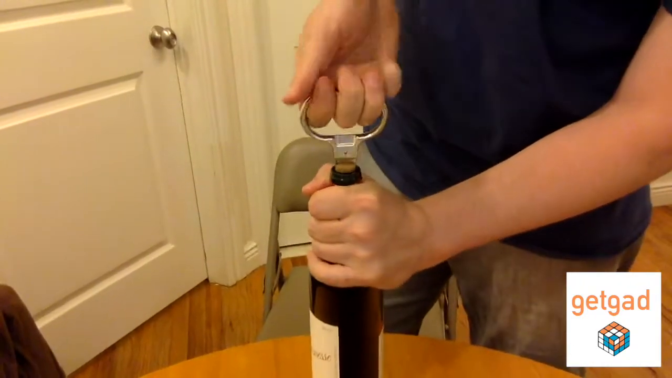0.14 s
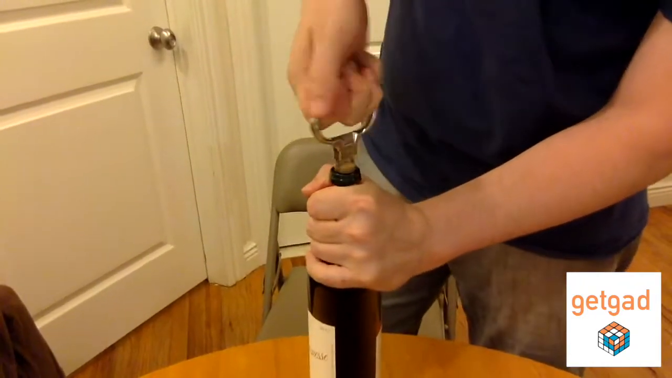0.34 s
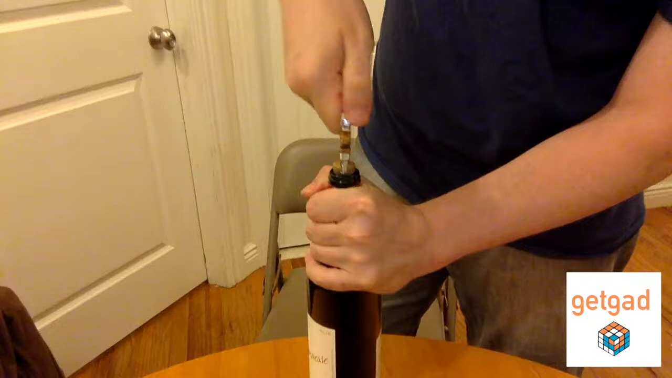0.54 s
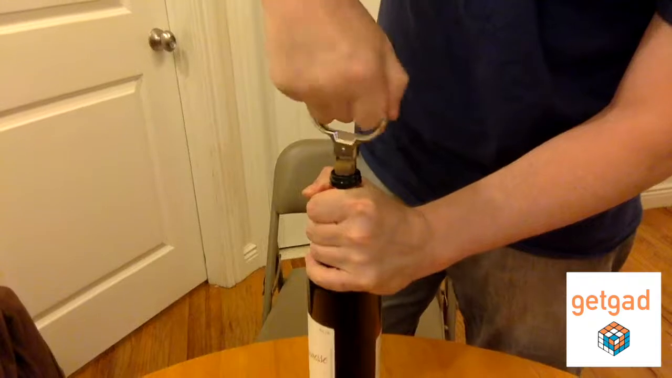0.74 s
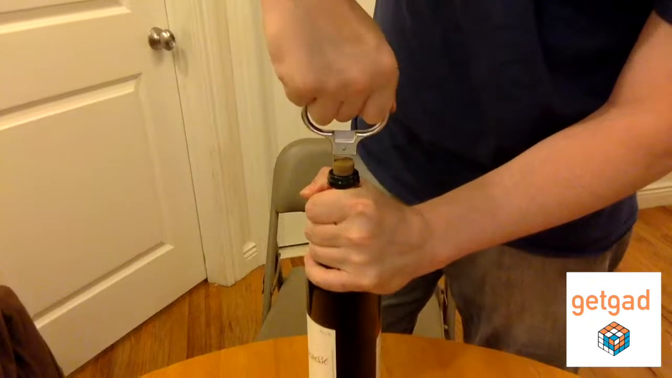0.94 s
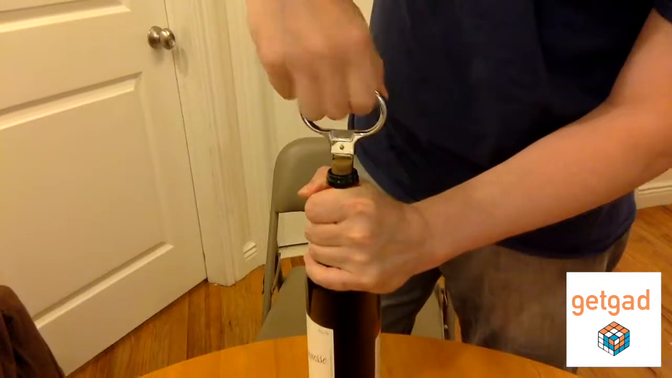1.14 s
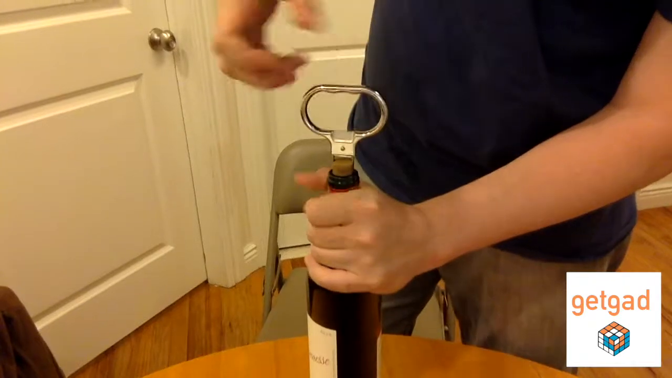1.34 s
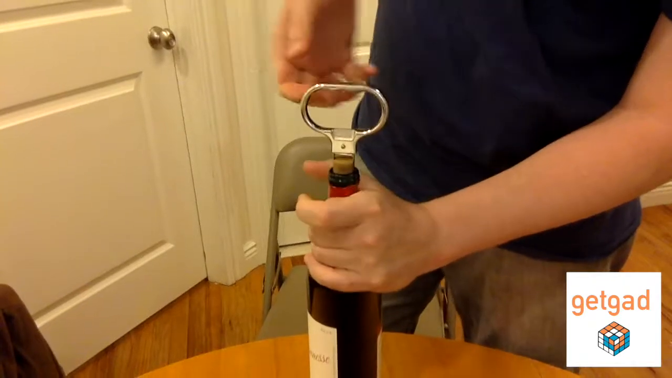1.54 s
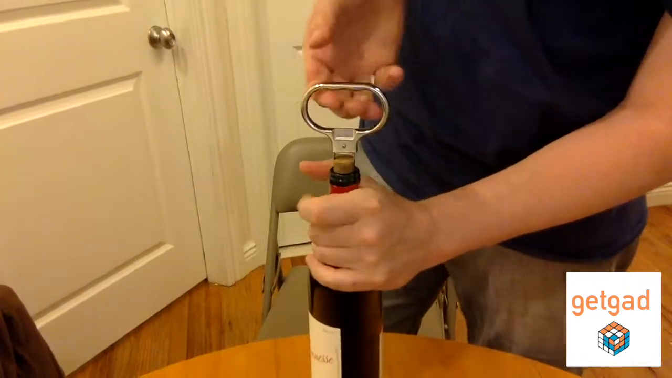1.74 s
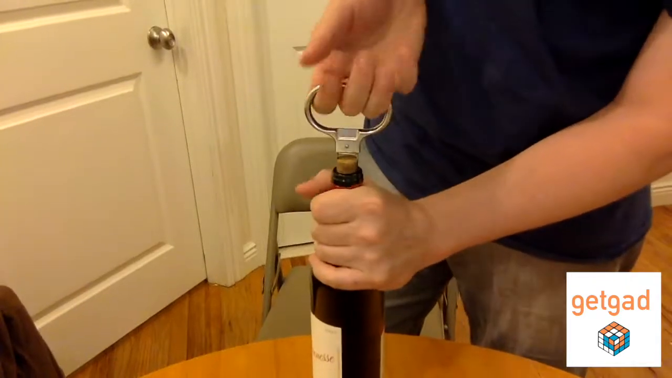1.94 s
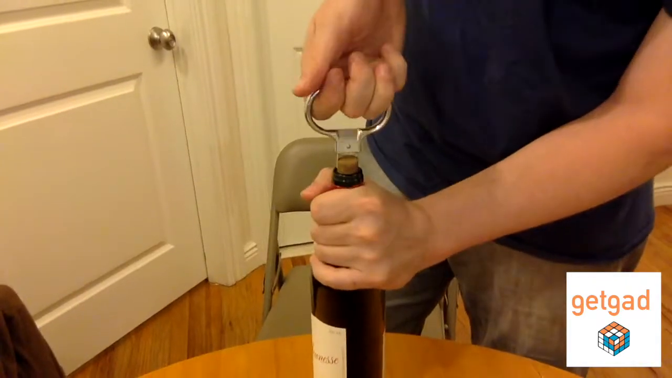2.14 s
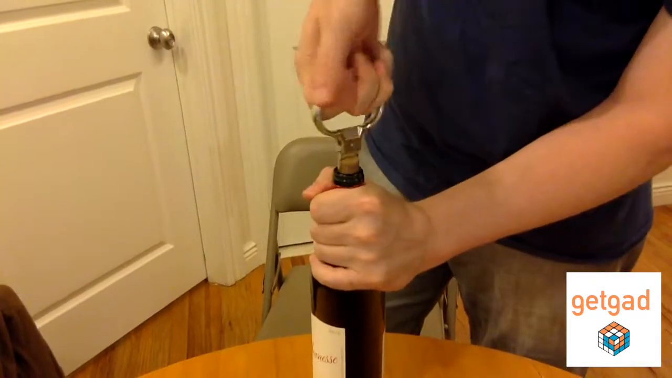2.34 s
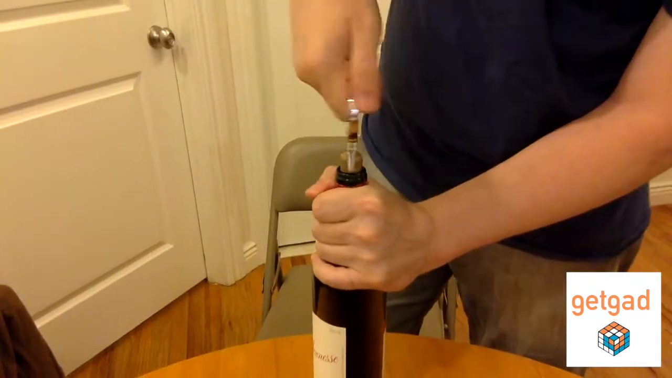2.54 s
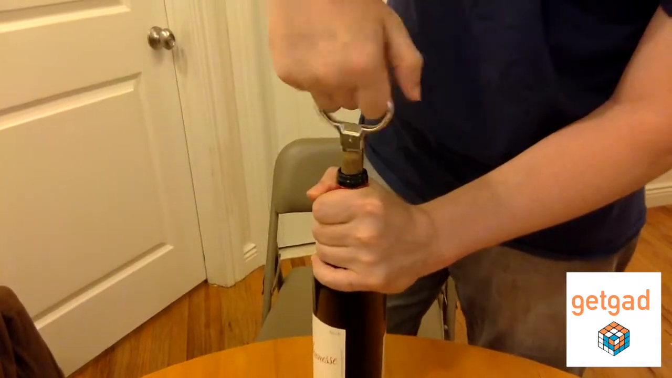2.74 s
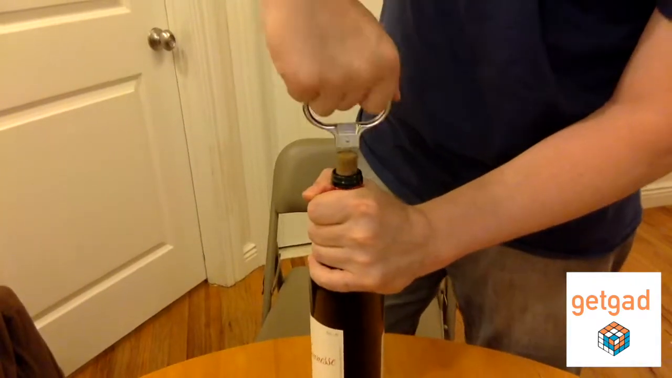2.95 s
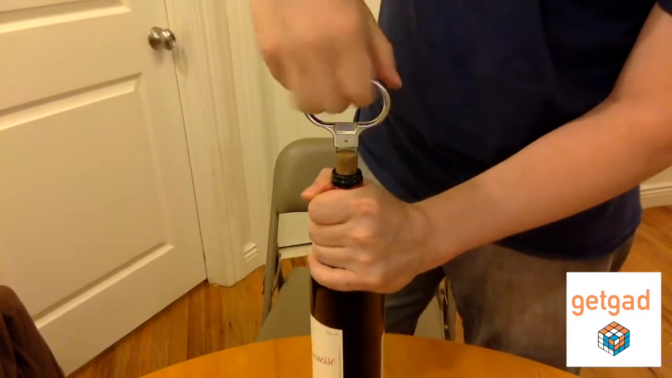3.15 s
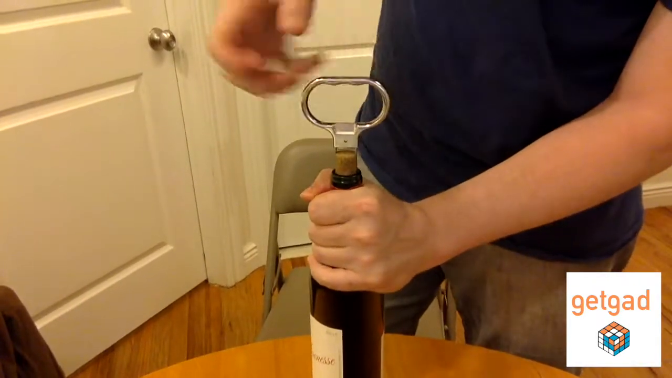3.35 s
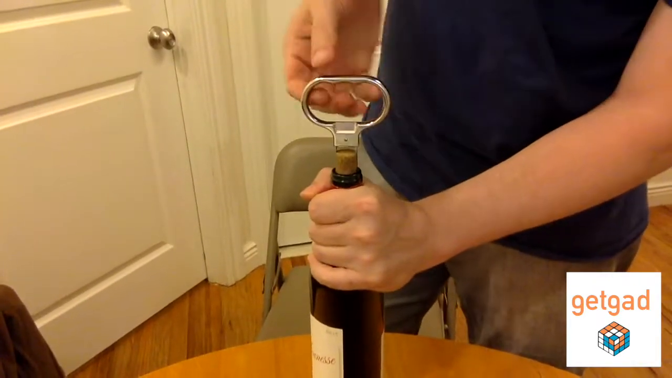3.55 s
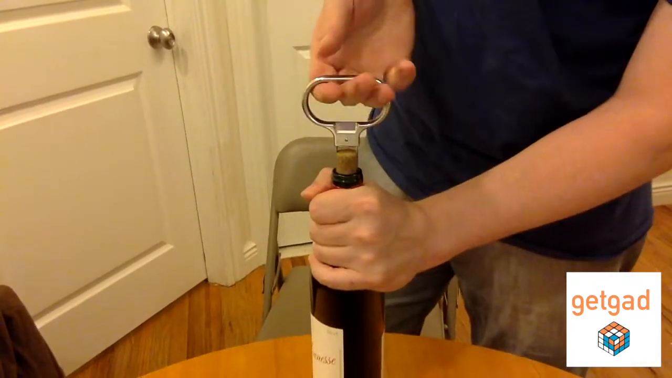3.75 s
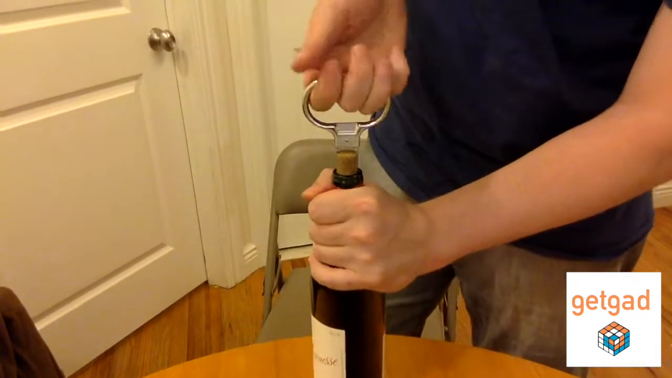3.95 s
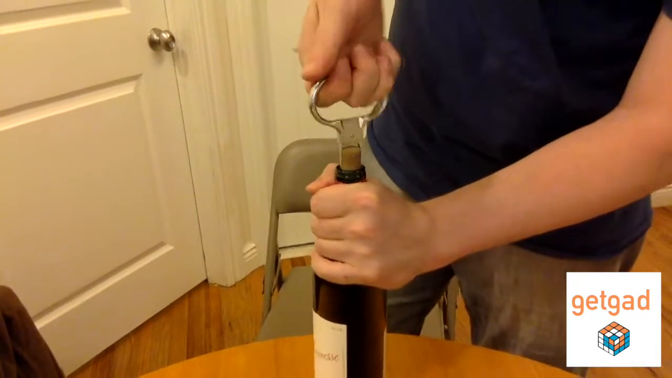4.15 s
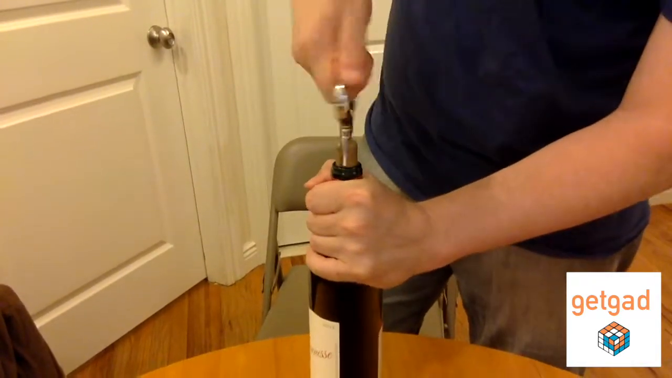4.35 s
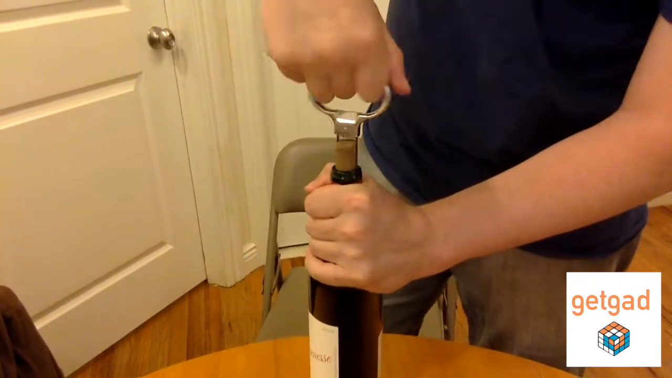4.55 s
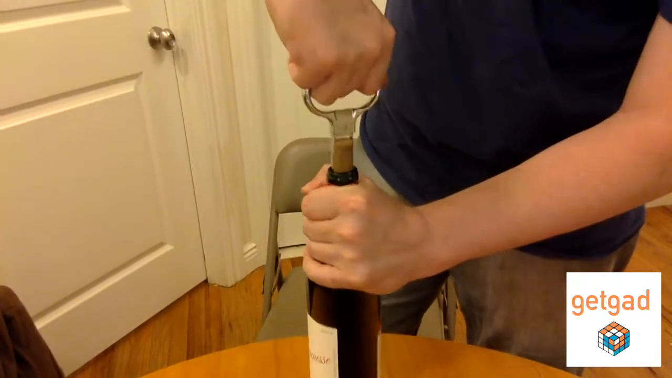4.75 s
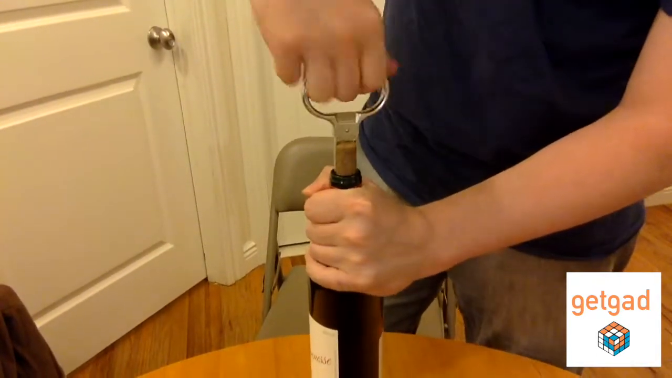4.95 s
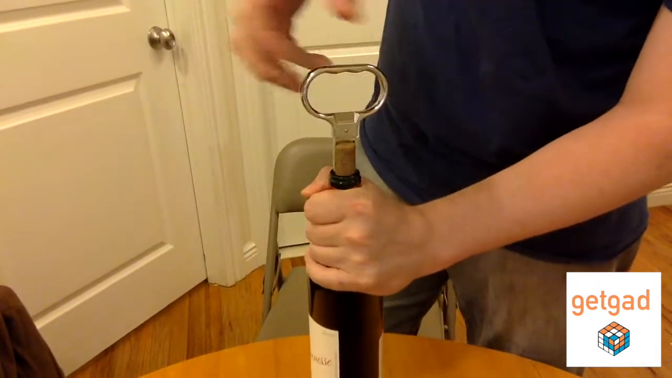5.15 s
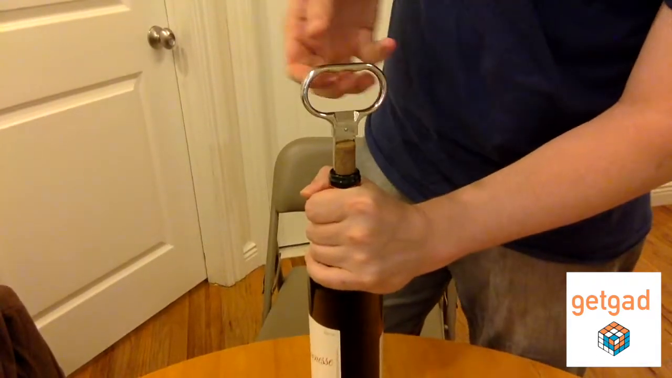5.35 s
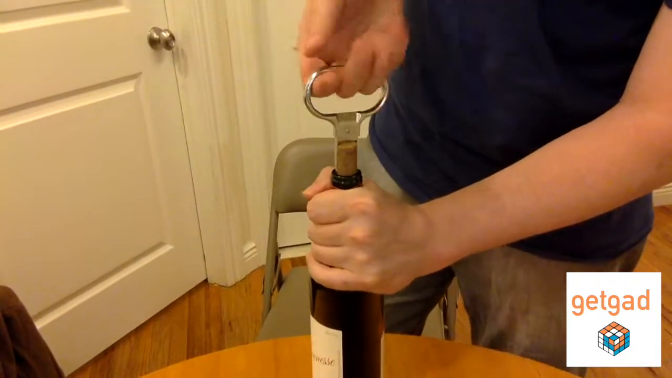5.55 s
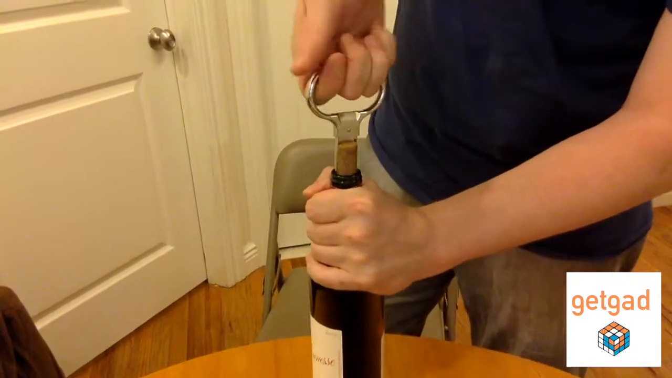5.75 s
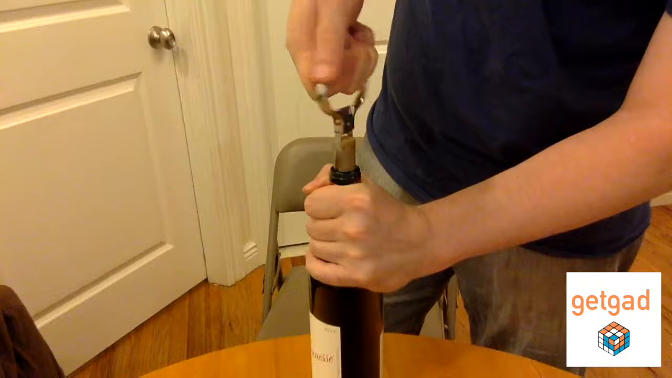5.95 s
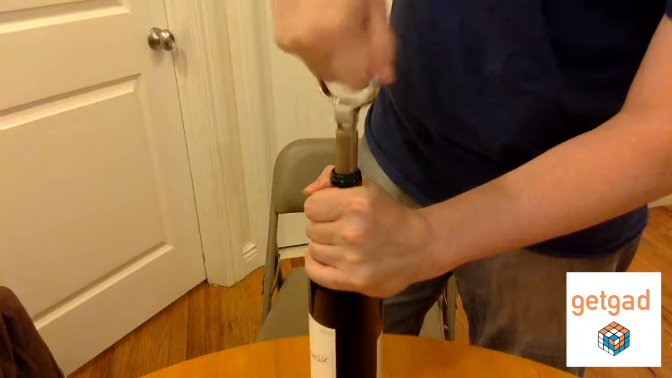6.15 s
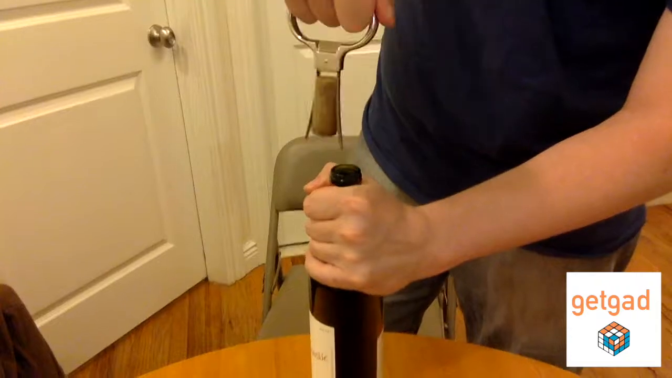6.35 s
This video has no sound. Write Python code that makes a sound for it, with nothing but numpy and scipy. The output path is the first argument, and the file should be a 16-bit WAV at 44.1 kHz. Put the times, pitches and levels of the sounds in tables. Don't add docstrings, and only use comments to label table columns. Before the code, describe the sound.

Dry, grating cork creaks chatter in four pulls, each under a second, with faint room hum between them. The first is duller and woody, the next two are stronger and glassier with thin metallic ringing, and the last is a quick rush of ticks, a soft thump, a tiny rising squeak and a bright clink of steel on glass. Heard close, in a small hard room with a short diffuse tail.

```python
import sys
import numpy as np
from scipy import signal
from scipy.fft import rfft, irfft
from scipy.io import wavfile

SR = 44100
rng = np.random.default_rng(int(sys.argv[2]) if len(sys.argv) > 2 else 0)


def decibels_to_gain(level_db):
    exponent = np.asarray(level_db, float) / 20
    return 10 ** exponent


def transcribe(signal):
    frames = np.atleast_2d(signal).T
    limited = np.clip(frames, -1, 1)
    pcm = np.round(limited * 32767).astype(np.int16)
    wavfile.write(sys.argv[1], SR, pcm)


N = 282681


def rms_one(x):
    return x / np.sqrt(np.mean(x ** 2) + 1e-20)


def edge(x, hz, kind, order=4):
    return signal.sosfilt(signal.butter(order, hz, kind, fs=SR, output="sos"), x)


def at_hz(points, hz):
    points = np.array(points)
    return np.interp(np.log(hz + 1), np.log(points[:, 0]), points[:, 1])


def follow(t, s, level_db):
    return decibels_to_gain(np.interp(t, s, level_db, left=-200, right=-200))


def coloured(x, spectrum):
    size = 4096
    cepstrum = irfft(np.log(decibels_to_gain(at_hz(spectrum, np.fft.rfftfreq(size, 1 / SR)))), size)
    cepstrum[1:size // 2] *= 2
    cepstrum[size // 2 + 1:] = 0
    response = irfft(np.exp(rfft(cepstrum)), size)
    return signal.fftconvolve(x, response / np.sqrt(np.sum(response ** 2)))[:N]


def ring(force, modes, scatter_db):
    out = np.zeros(N)
    for hz, level_db, t60 in modes:
        r = decibels_to_gain(-60 / (t60 * SR))
        w = 2 * np.pi * hz / SR
        struck = force * decibels_to_gain(level_db + scatter_db * rng.standard_normal(N))
        out += signal.lfilter([0, np.sin(w)], [1, -2 * r * np.cos(w), r * r], struck + 1e-18)
    return out


def tearing(force, db_per_ms):
    r = decibels_to_gain(-2 * db_per_ms * 1000 / SR)
    power = signal.lfilter([1 - r], [1, -r], force ** 2 + 1e-24)
    return np.sqrt(power) * rng.standard_normal(N)


def glide(rows, partials):
    s, hz, level_db = np.transpose(rows)
    t = np.arange(N) / SR
    phase = 2 * np.pi * np.cumsum(np.interp(t, s, hz)) / SR
    tone = sum(decibels_to_gain(db) * np.sin(k * phase) for k, db in partials)
    return np.sqrt(2) * follow(t, s, level_db) * tone


# [f/Hz, level/dB per Hz]
AIR_SPECTRUM = [(30, -30), (55, -1), (150, -18), (244, -15), (600, -25), (1100, -15.5), (6330, -35),
                (8080, -45)]
# [f/Hz, level/dB rms]
HUM_TONES = [(60, -77.5), (120, -81.5), (8900, -100)]
# [t/s, f/Hz, level/dB]
MOTOR = [
    (0, 71.8, -75),
    (1.0, 72, -77),
    (1.5, 73.7, -72),
    (2.3, 72, -61),
    (3.0, 69.6, -79),
    (6.4, 71.4, -88),
]


def room_tone():
    t = np.arange(N) / SR
    out = decibels_to_gain(-68) * coloured(rng.standard_normal(N), AIR_SPECTRUM)
    for hz, level_db in HUM_TONES:
        out += np.sqrt(2) * decibels_to_gain(level_db) * np.sin(2 * np.pi * hz * t)
    return out + glide(MOTOR, [(0.93, 0.0095)])


# [t/s, peak level/dB]
HAND_NUDGES = [(0.12, -53), (2.118, -56.5), (3.638, -57.5), (3.799, -51), (3.832, -57), (3.868, -51),
               (4.11, -54), (4.877, -37.5), (4.97, -48.5), (5.267, -61), (5.61, -58), (5.63, -54),
               (5.655, -58), (6.165, -32), (6.187, -29)]
# [f/Hz, level/dB, T60/s]
TABLE_MODES = [(265.3, 0.5, 0.14), (271.2, 1.5, 0.08), (322, 1, 0.099), (348.4, -14.5, 0.012),
               (462.4, -17, 0.15)]
# [f/Hz, level/dB, T60/s]
LEG_MODES = [(98.3, -10, .2), (151.8, -16.5, 0.288)]


def nudges():
    hand_damping = 0.47
    force = np.zeros(N)
    for s, db in HAND_NUDGES:
        force[round(s * SR)] = decibels_to_gain(db)
    soft = edge(force, 840.0, "low", order=2)
    damped = [(hz, db, t60 * hand_damping) for hz, db, t60 in TABLE_MODES + LEG_MODES]
    thud = ring(force, damped, scatter_db=2)
    return edge(decibels_to_gain(-11.0) * thud + decibels_to_gain(12.0) * soft, 65.0, "high")


# [f/Hz, T60/s]
REVERBERATION = [(200, 0.35), (1000, 0.39), (4000, 0.41), (12000, 0.29)]


def room(x):
    gap_s, onset_s = .003, 0.0078
    t = np.arange(SR // 2) / SR
    tail = np.zeros(len(t))
    edges = 60 * 2. ** np.arange(9)
    for low, high in zip(edges, edges[1:]):
        octave = signal.butter(2, [low, high], "band", fs=SR, output="sos")
        band = signal.sosfilt(octave, rng.standard_normal(len(t)))
        tail += band * decibels_to_gain(-60 * t / at_hz(REVERBERATION, np.sqrt(low * high)))
    tail *= np.clip((t - gap_s) / onset_s, 0, 1)
    return signal.fftconvolve(x, tail / np.sqrt(np.sum(tail ** 2)))[:N]


# [t/s, peak level/dB, tick pitch f/Hz]
LOAD_CREAKS = [(0.2143, -52, 5300), (2.2172, -46, 3600), (2.2299, -56, 2600), (2.2479, -48, 3200),
               (2.2814, -36, 3300), (4.1086, -58, 3000), (4.1131, -56, 5300), (4.1302, -58, 3000),
               (4.1338, -56, 5300), (5.9208, -48, 4100)]
# [t/s, peak level/dB, tick pitch f/Hz]
FIRST_PULL = [(0.2583, -32, 2400), (0.3032, -29, 4770), (0.3336, -24, 2590), (0.3611, -25, 2600),
              (0.385, -23, 4410), (0.4145, -23, 4650), (0.4489, -25, 4640), (0.4813, -24, 4580),
              (0.5162, -23, 4120), (0.5304, -22, 2990), (0.5616, -21, 3920), (0.5975, -23, 4130),
              (0.6355, -22, 4480), (0.6624, -24, 2280), (0.6914, -24, 3640), (0.7424, -24, 3600),
              (0.7904, -23, 4680), (0.8215, -24, 2300), (0.8374, -21, 2300), (0.8974, -26, 2630),
              (0.9572, -23, 2270), (0.9804, -34, 3010)]
SECOND_PULL = [(2.2842, -25, 2560), (2.3072, -23, 3000), (2.3346, -22, 5440), (2.3625, -23, 4340),
               (2.3885, -20, 5980), (2.4139, -18, 5450), (2.4453, -18, 5860), (2.4862, -17, 6360),
               (2.5042, -19, 3080), (2.5586, -19, 3640), (2.6145, -19, 3010), (2.6549, -18, 3350),
               (2.6664, -18, 2200), (2.6804, -18, 2280), (2.7014, -19, 2200), (2.7487, -19, 2340),
               (2.7831, -20, 2410), (2.8115, -21, 2470), (2.837, -19, 4270), (2.8594, -20, 2360),
               (2.8844, -21, 2990), (2.9432, -20, 4260), (2.9684, -31, 4350)]
THIRD_PULL = [(4.151, -24, 4270), (4.1834, -21, 3100), (4.2108, -21, 4260), (4.2423, -21, 3000),
              (4.2966, -19, 4310), (4.3224, -17, 4380), (4.3354, -21, 3000), (4.36, -15, 4310),
              (4.3959, -15, 4350), (4.4413, -14, 4340), (4.4712, -12, 4410), (4.4874, -14, 4480),
              (4.5131, -17, 4400), (4.5241, -15, 4420), (4.5374, -13, 4310), (4.5664, -17, 5190),
              (4.5944, -17, 4420), (4.6229, -16, 4290), (4.6464, -17, 4260), (4.6794, -16, 3010),
              (4.7144, -17, 4260), (4.7374, -17, 4170), (4.7584, -21, 3000)]
LAST_PULL = [(5.9279, -19, 4430), (5.9609, -15, 4420), (5.9778, -18, 4260), (6.0033, -19, 4430),
             (6.0252, -19, 4430), (6.0437, -20, 4420), (6.0554, -20, 4430), (6.0694, -20, 3980),
             (6.0871, -21, 4290), (6.1025, -18, 4380), (6.1294, -19, 3860), (6.1434, -20, 3940),
             (6.1834, -20, 3820), (6.2134, -20, 3990)]
# [from t/s, until t/s, gap between slips/s, stick before next/s, tick f/Hz]
CREEP_RUNS = [
    (0.25, 0.37, .0148, .008, 2800),
    (0.37, 0.65, .0135, .016, 4000),
    (0.65, 0.9, .0115, .006, 3600),
    (2.41, 2.5, .0135, .008, 5800),
    (2.5, 2.69, .0135, .008, 3400),
    (2.69, 2.95, .016, .009, 3300),
    (4.18, 4.55, .0128, .007, 5100),
    (4.55, 4.76, .0085, .005, 5300),
    (6.1, 6.22, .007, .004, 4000),
]


def slips():
    rise_s, breakaway_db = .001, 2
    twin_lag_s, twin_db, twin_scatter_db = .0041, -5.5, 2
    creep_db, creep_scatter_db, jitter, octaves = -3.5, 2, .08, 0.39
    rows, stuck = list(LOAD_CREAKS), np.zeros(N)
    for big in (FIRST_PULL, SECOND_PULL, THIRD_PULL, LAST_PULL):
        for (s, db, hz), (next_s, next_db, _) in zip(big, big[1:] + big[-1:]):
            chance = rng.standard_normal((8, 3)).clip(-2, 2)
            if s == big[0][0]:
                db += breakaway_db
            s, next_s = s + rise_s, next_s + rise_s
            rows.append((s, db, hz))
            twin_level = db + twin_db + twin_scatter_db * chance[0, 0]
            rows.append((s + twin_lag_s, twin_level, hz * 2 ** (octaves * chance[0, 1])))
            for start, end, gap, stick, creep_hz in CREEP_RUNS:
                if not start <= (s + next_s) / 2 < end:
                    continue
                stuck[round((next_s - stick) * SR):round(next_s * SR)] = 1
                count = int((next_s - stick - s) / gap)
                for k, (late, loud, high) in zip(range(1, 1 + count), chance[1:]):
                    level = (db + next_db) / 2 + creep_db + creep_scatter_db * loud
                    rows.append((s + (k + jitter * late) * gap, level, creep_hz * 2 ** (octaves * high)))
    return np.array(rows), stuck


# [t/s, fine rubbing level/dB, free neck ring level/dB]
TWISTING = [
    [(0.256, -39, -9), (0.5, -28, -14), (0.774, -25.5, -22), (0.81, -41, -9), (0.83, -24, -8),
     (0.874, -29, -7), (0.97, -59, -7)],
    [(2.28, -45, -12), (2.314, -33.5, -16), (2.684, -25.5, -19), (2.81, -25.5, -5), (2.87, -20.5, -7),
     (2.97, -37.5, -3)],
    [(4.148, -36, -1), (4.31, -27, 1), (4.48, -28, -0.7), (4.62, -24.5, -3.5), (4.728, -28.5, -1.5),
     (4.78, -41, -8)],
    [(5.926, -58, -1.5), (6.09, -30, 1), (6.11, -23, -1), (6.15, -30.5, -2), (6.188, -26.5, 3.5),
     (6.24, -26, 1)],
]
# [table shake/dB, upper table modes/dB, bottle body/dB, bright fizz/dB, snap and glass/dB]
PULL_SHARES = [
    (-3, 2, -2.5, -20.5, -1),
    (-6.5, 1, -6, -23.5, -1),
    (-7, 1.5, -9, -25, -2.5),
    (-5.5, 3.5, -10.5, -28.5, -6.5),
]


def controls():
    t = np.arange(N) / SR
    fine = sum(follow(t, *np.transpose(rows)[:2]) for rows in TWISTING)
    neck = decibels_to_gain(np.interp(t, *np.concatenate(TWISTING).T[::2]))
    pull = np.searchsorted([rows[-1][0] + .5 for rows in TWISTING], t)
    return [fine, neck, *decibels_to_gain(np.array(PULL_SHARES)[pull].T)]


# [f/Hz, level/dB per Hz]
SNAP_SPECTRUM = [(1200, -26), (1800, -4.5), (2300, 10.5), (4400, 6), (6700, 10), (7500, -26.5), (9000, -42),
                 (16000, -75.5)]


def tick(at, hz, cycles):
    length = 400
    out = np.zeros(N + length)
    t = np.arange(length) / SR
    for i in np.flatnonzero(at):
        decay = t * hz[i] / cycles
        out[i:i + length] += at[i] * np.e * decay * np.exp(-decay) * np.sin(2 * np.pi * hz[i] * t)
    return out[:N]


def slip_ticks(force, pitch, bright, crisp):
    snap = coloured(crisp * (.8 * force + .6 * tearing(force, db_per_ms=11)), SNAP_SPECTRUM)
    crackle = tearing(force * bright, db_per_ms=4)
    fizz = edge(edge(crackle, 7600.0, "high"), 8900.0, "low", order=2)
    ticks = decibels_to_gain(-6.5) * tick(force, pitch, cycles=1.3) + decibels_to_gain(6.5) * snap
    ticks = edge(ticks, 6500.0, "low", order=6) + decibels_to_gain(25.0) * fizz
    lag = round(.0016 * SR)
    ticks[lag:] += .45 * ticks[:-lag]
    return ticks


# [f/Hz, level/dB, T60/s]
GLASS_MODES = [(2343, 4, 0.022), (2430, -18.5, 0.0095), (2882, -5, 0.017), (3280, -8, 0.045),
               (3726, -5.5, 0.005), (6100, -27.5, 0.01), (6705, -4.5, .02), (8250, -17.5, 0.033),
               (10300, -23.5, 0.016), (11200, -36.5, 0.012)]
# [f/Hz, level/dB, T60/s]
NECK_MODES = [(4326, 2.5, 0.02), (4185, -16, 0.01), (4465, -14.5, 0.028), (4590, -11, 0.02),
              (5432, -1, 0.02), (7140, -34, 0.023), (7560, -20.5, 0.027)]


def glass_ring(force, crisp, neck):
    glass = decibels_to_gain(-16.0) * ring(force * crisp, GLASS_MODES[:7], scatter_db=4.0)
    glass += decibels_to_gain(-13.5) * ring(force * neck, NECK_MODES, scatter_db=1.5)
    glass = edge(glass, 8300.0, "low", order=6)
    return glass + decibels_to_gain(-15.5) * ring(force, GLASS_MODES[7:], scatter_db=5.0)


def table_ring(push, upper):
    top = ring(push, TABLE_MODES[:2], scatter_db=-1.0) + ring(push * upper, TABLE_MODES[2:], scatter_db=0.5)
    top = edge(edge(top, 256.0, "high", order=6), 740.0, "low")
    legs = edge(edge(ring(push, LEG_MODES, scatter_db=1.0), 49.0, "high"), 170.0, "low")
    return top + legs


# [f/Hz, level/dB, T60/s]
BOTTLE_MODES = [(786.3, -5, 0.25), (828, 7, 0.031), (997, 0, 0.034), (1147.5, -7.5, 0.054),
                (1242, -10.5, 0.059), (1479, -22, 0.18)]


def bottle_ring(force):
    return edge(ring(force, BOTTLE_MODES, scatter_db=3), 928.0, "high")


def cork():
    fine, neck, shake, upper, body, bright, crisp = controls()
    clear, stuck = slips()

    rate_hz, stick_db, fine_fizz_db, fine_shake_db = 500.0, -14, 0.5, 0
    pitch = 3800.0 * 2 ** (0.47 * rng.standard_normal(N).clip(-2, 2))
    happens = rng.random(N) < rate_hz / SR
    size = decibels_to_gain(2 * np.minimum(rng.exponential(1, N), 4))
    small = happens * size * rng.choice([-1, 1], N)
    force = decibels_to_gain(-5.5) * small * fine * decibels_to_gain(stick_db * stuck)

    at = (clear[:, 0] * SR).round().astype(int)
    bright, shake = bright * decibels_to_gain(fine_fizz_db), shake * decibels_to_gain(fine_shake_db)
    bright[at] /= decibels_to_gain(fine_fizz_db)
    shake[at] /= decibels_to_gain(fine_shake_db)
    force[at], pitch[at] = decibels_to_gain(clear[:, 1]), clear[:, 2]
    body[at[:len(LOAD_CREAKS)]] *= decibels_to_gain(8)

    ticks = slip_ticks(force, pitch, bright, crisp)
    glass = glass_ring(force, crisp, neck)
    table = table_ring(np.abs(force) * shake, upper)
    bottle = bottle_ring(force * body)
    return edge(ticks + glass, 2194.0, "high") + decibels_to_gain(-19.5) * table + decibels_to_gain(-14.5) * bottle


# [t/s, low mode level/dB, high mode level/dB]
HANDLE_JOLTS = [(0.4, -56, -59), (0.62, -58, -55), (0.8, -48.5, -50), (0.93, -53.5, -52.5),
                (2.56, -55, -38), (2.72, -64, -46), (2.86, -50.5, -39.5), (4.27, -55.5, -41),
                (4.41, -46.5, -58), (4.55, -46, -40), (4.67, -48.5, -36.5), (5.96, -56.5, -44),
                (6.22, -75, -64), (6.275, -52, -61)]
# [f/Hz, level/dB]
LOW_MODES = [(1230, -10), (1283, 1)]
HIGH_MODES = [(2991, 0.017)]


def handle():
    swell_s, low_t60_s, high_t60_s = .03, 0.89, .3
    t = np.arange(N) / SR
    jolts = np.array(HANDLE_JOLTS)
    age = np.maximum(t - jolts[:, :1], 0)
    swell = (1 - np.exp(-age / swell_s)) ** 2
    out = np.zeros(N)
    for column, modes, t60 in ((1, LOW_MODES, low_t60_s), (2, HIGH_MODES, high_t60_s)):
        power = decibels_to_gain(2 * jolts[:, column]) @ (swell * decibels_to_gain(-120 * age / t60))
        out += np.sqrt(2 * power) * sum(decibels_to_gain(db) * np.sin(2 * np.pi * hz * t) for hz, db in modes)
    return decibels_to_gain(7.0) * out


# [t/s, level/dB]
FINGER_SLIDE = [
    (3.15, -77),
    (3.3, -77),
    (3.45, -76.5),
    (3.58, -87),
]


def brush():
    hiss = edge(edge(rng.standard_normal(N), 1900.0, "high"), 4700.0, "low")
    return follow(np.arange(N) / SR, *np.transpose(FINGER_SLIDE)) * rms_one(hiss)


# [harmonic number, level/dB]
PARTIALS = [(1, -7), (2, -6), (3, -5), (4, -5), (5, -26)]


def squeal_note(start, end, from_hz, to_hz, level_db):
    edge_s, edge_db = 0.0033, -12
    rows = [(start, from_hz, level_db + edge_db), (start + edge_s, from_hz, level_db),
            (end - 2 * edge_s, to_hz, level_db), (end, to_hz, level_db + edge_db)]
    return glide(rows, PARTIALS)


# [start t/s, end t/s, from f/Hz, to f/Hz, level/dB]
SQUEAL_NOTES = [
    (6.192, 6.231, 1380, 1280, -41.5),
    (6.228, 6.256, 2584, 2727, -32),
]
# [t/s, peak level/dB]
LIP_TAP = (6.2922, -27)
# [f/Hz, level/dB, T60/s]
PRONG_MODES = [(1240, -29, .9), (1316, -25, 0.41), (2630, -18, 0.083), (2988, -10.5, 0.23),
               (4220, 17, 0.0051), (6605, -12, 0.08), (8500, -29.5, .07), (10500, -28, 0.07),
               (11000, -29, .08)]


def release():
    flutter = decibels_to_gain(5 * rms_one(edge(rng.standard_normal(N), 350, "low", order=2)))
    notes = sum(squeal_note(*note) for note in SQUEAL_NOTES)
    squeal = edge(flutter * notes, 6100.0, "low", order=8)
    tap_s, tap_db = LIP_TAP
    tap = np.zeros(N)
    tap[round(tap_s * SR)] = decibels_to_gain(tap_db)
    bright = edge(tearing(tap, db_per_ms=3.0), 1500.0, "high", order=2)
    modes = ring(tap, PRONG_MODES, scatter_db=0)
    return squeal + decibels_to_gain(-8.0) * modes + decibels_to_gain(18.0) * bright


def scene():
    close = cork() + release() + nudges()
    return (close + decibels_to_gain(-6.0) * room(close) + handle() + brush() + room_tone())[None, :]


def band_limit(x):
    return signal.sosfilt(signal.butter(12, 16500, fs=SR, output="sos"), x)


def record(dry):
    top = signal.ellip(10, .5, 50, 16150, fs=SR, output="sos")
    mix = signal.sosfilt(top, edge(dry, 25.0, "high", order=2))
    return band_limit(mix)


dry = scene()
out = record(dry)
transcribe(out)
```